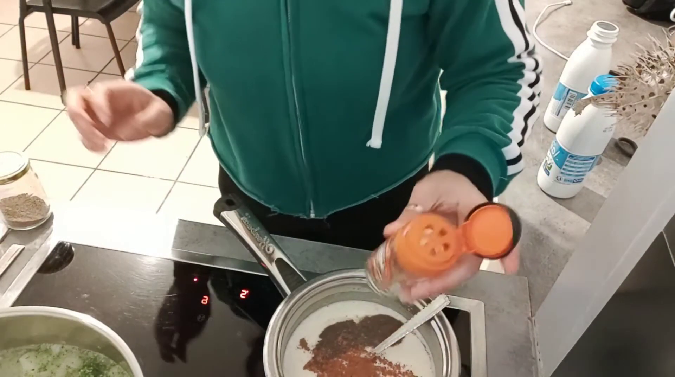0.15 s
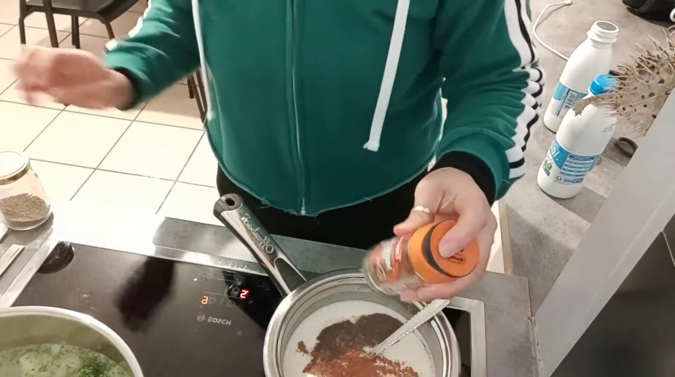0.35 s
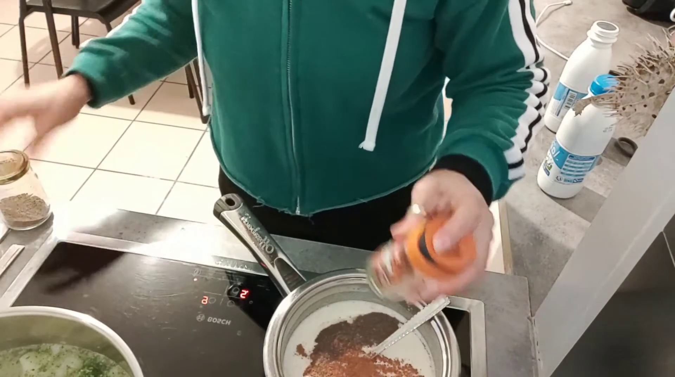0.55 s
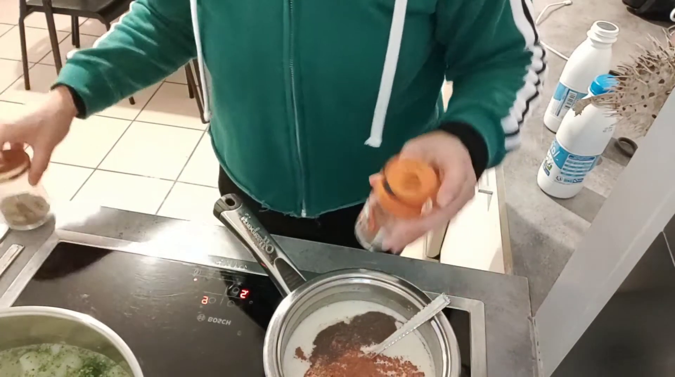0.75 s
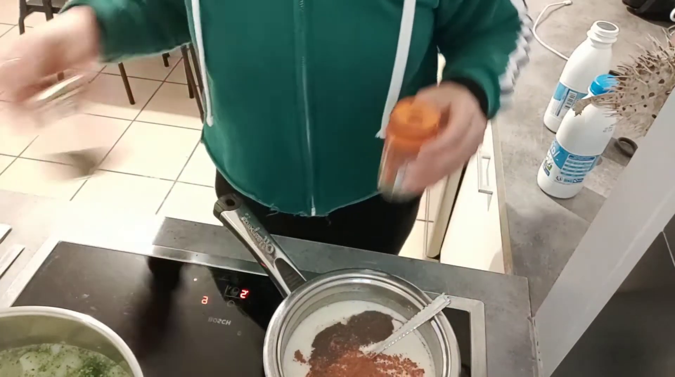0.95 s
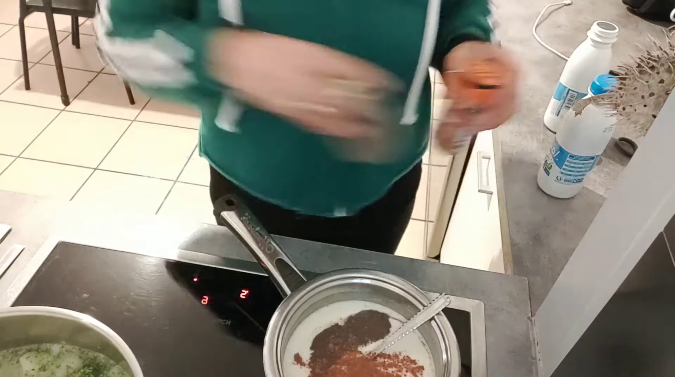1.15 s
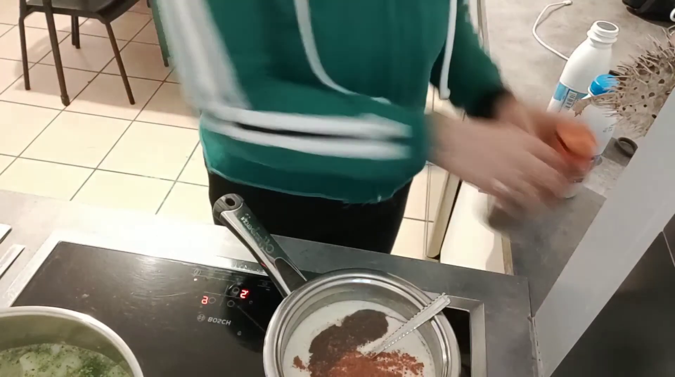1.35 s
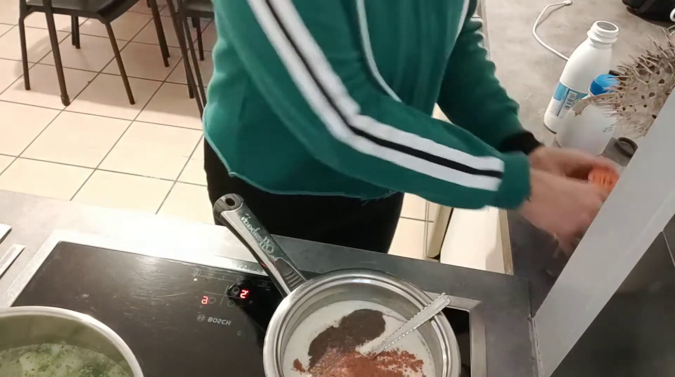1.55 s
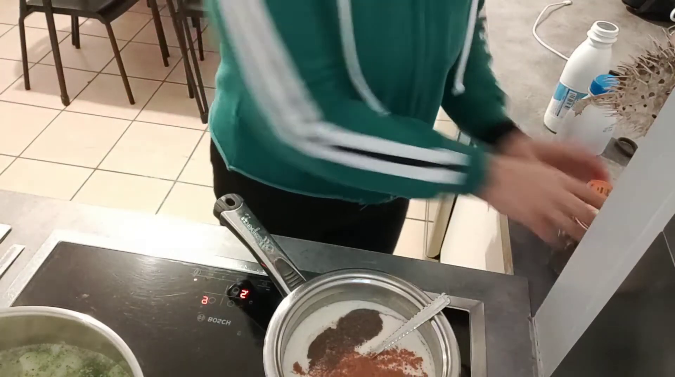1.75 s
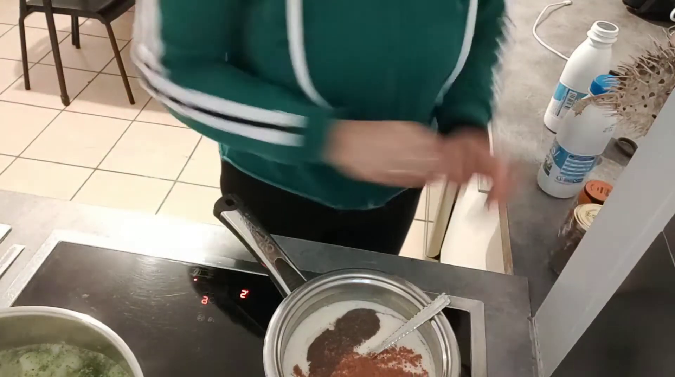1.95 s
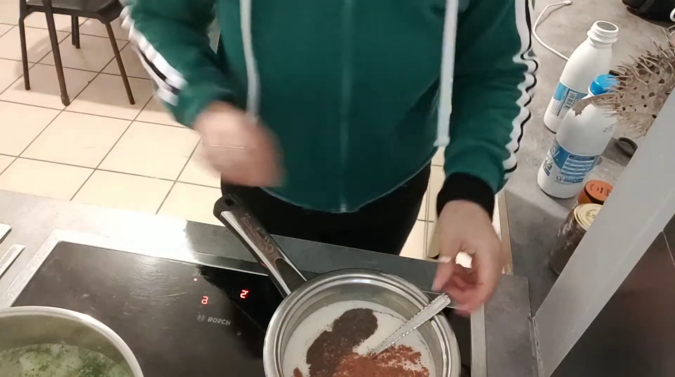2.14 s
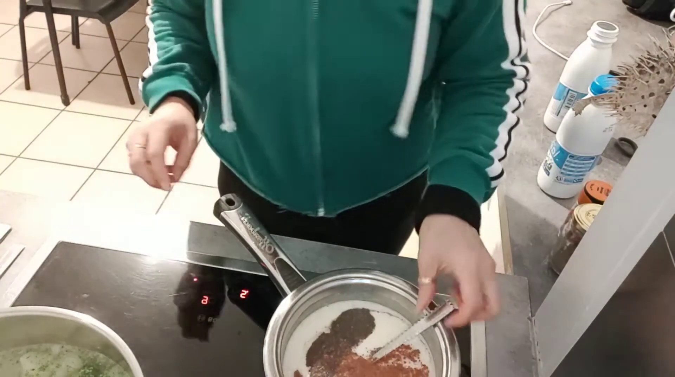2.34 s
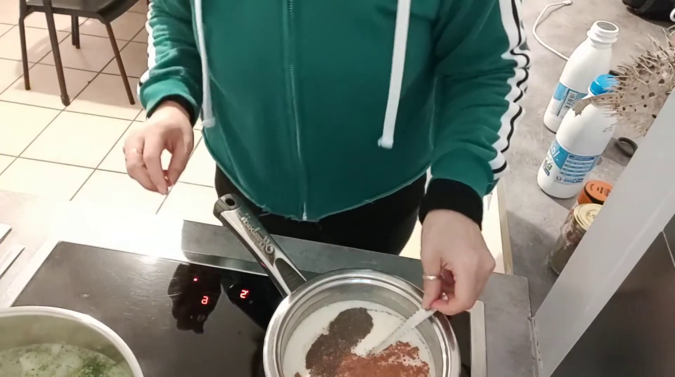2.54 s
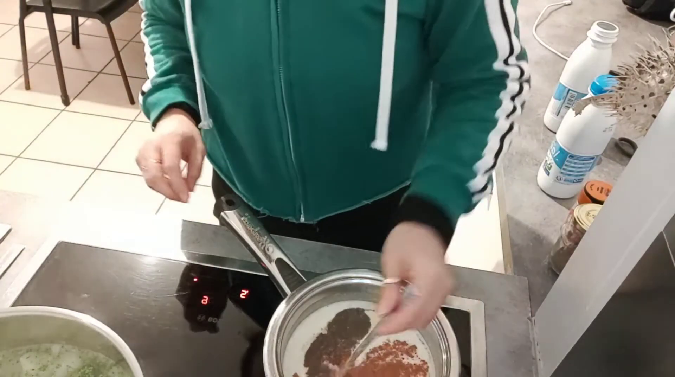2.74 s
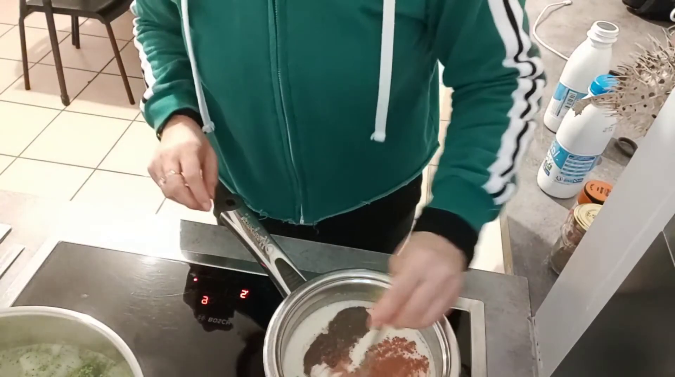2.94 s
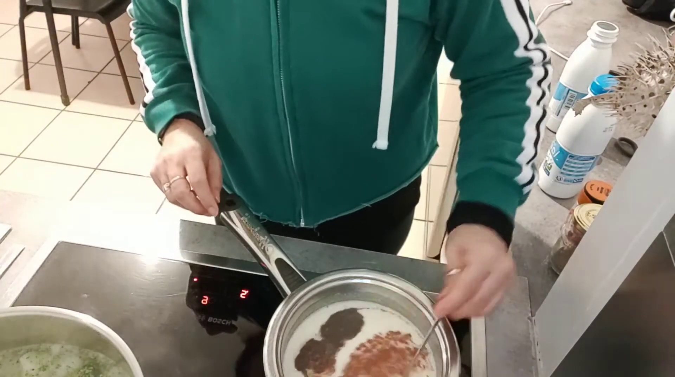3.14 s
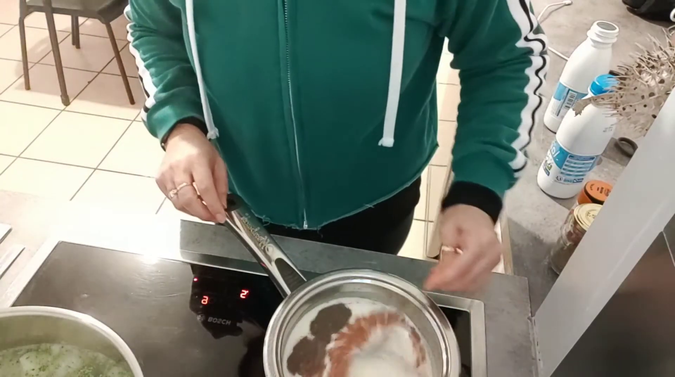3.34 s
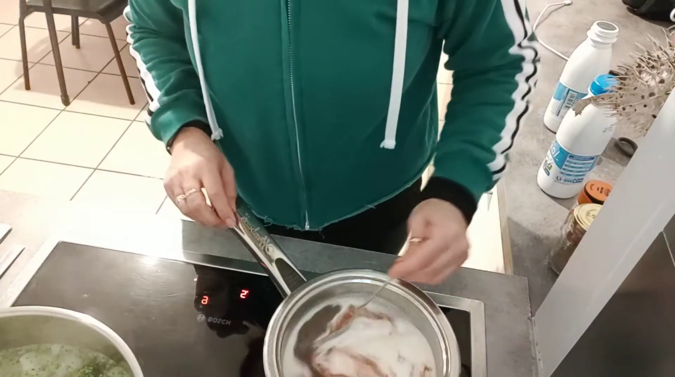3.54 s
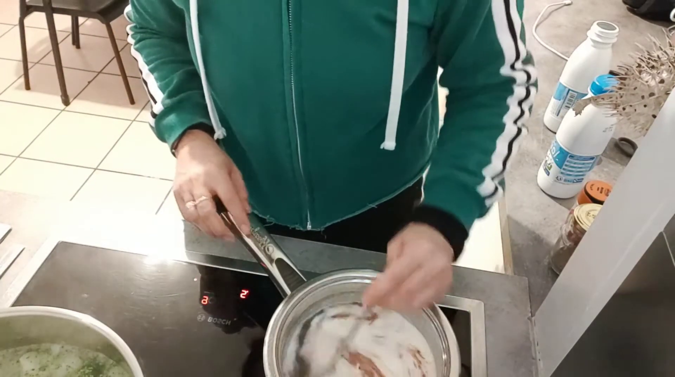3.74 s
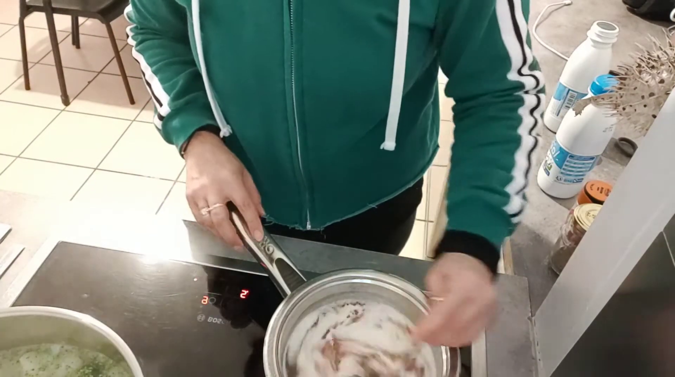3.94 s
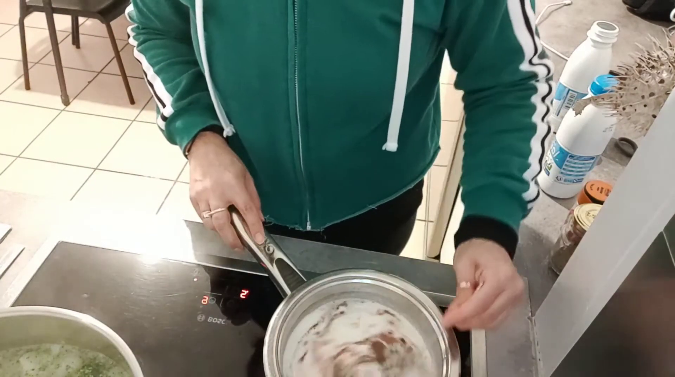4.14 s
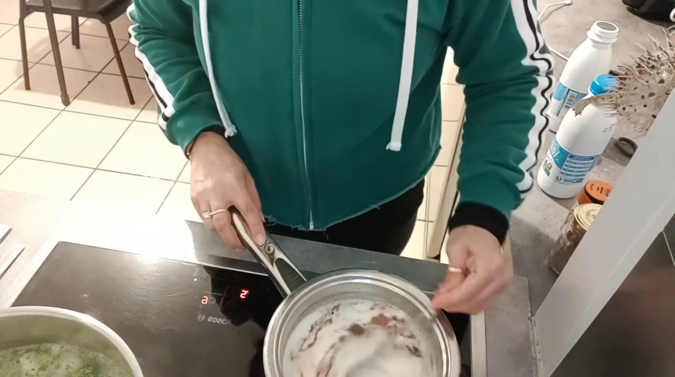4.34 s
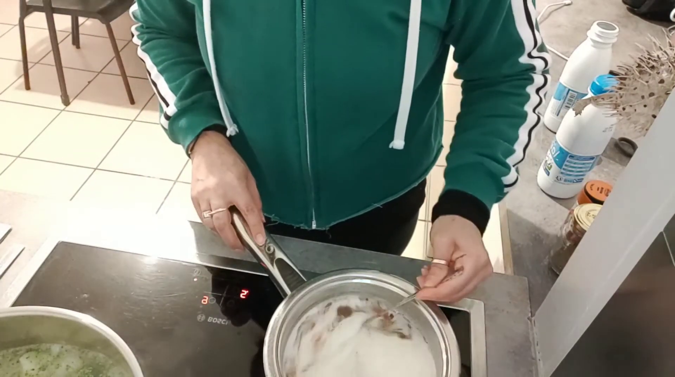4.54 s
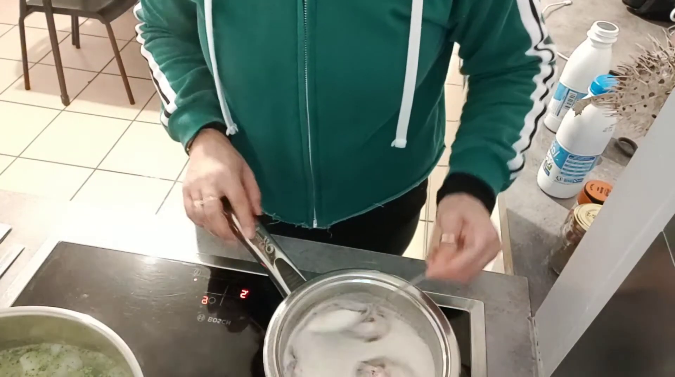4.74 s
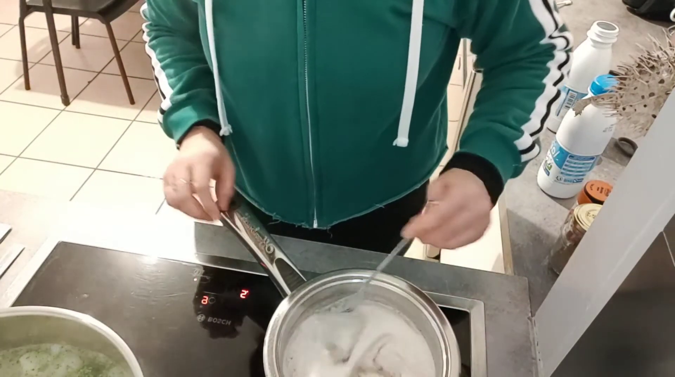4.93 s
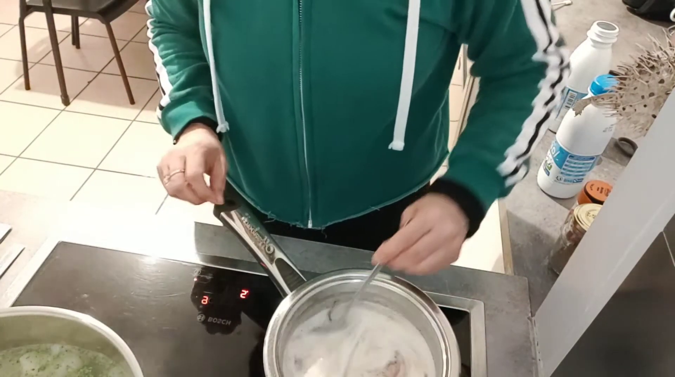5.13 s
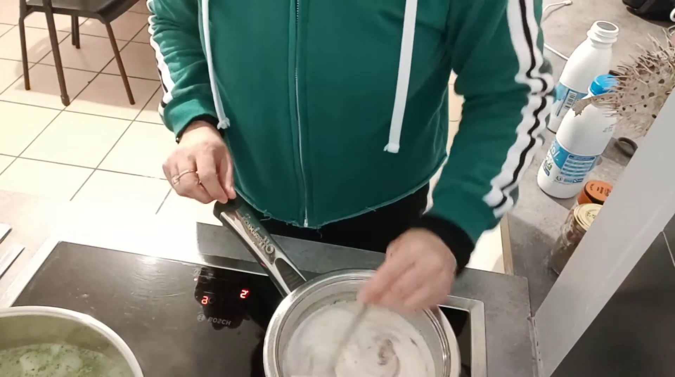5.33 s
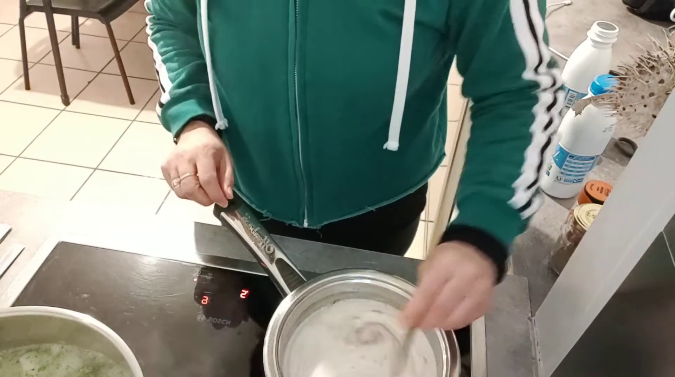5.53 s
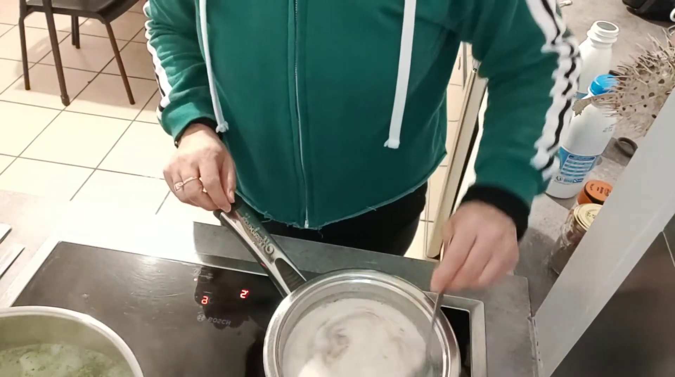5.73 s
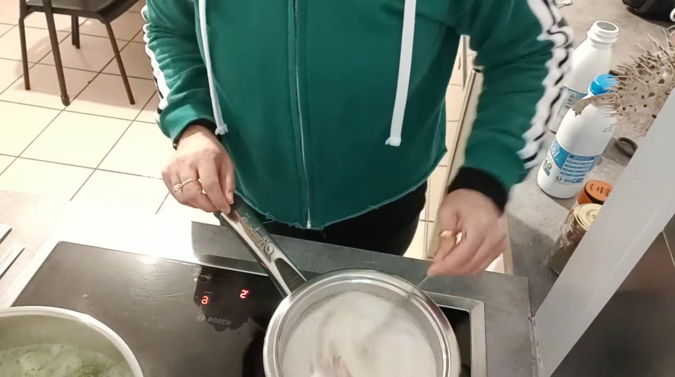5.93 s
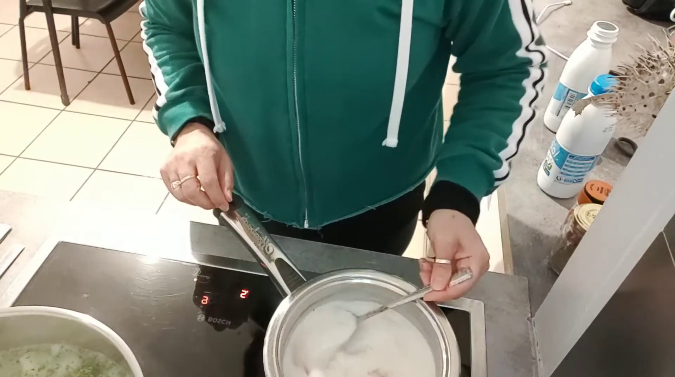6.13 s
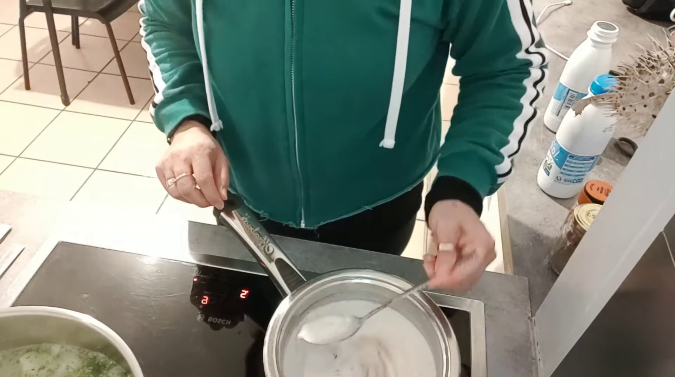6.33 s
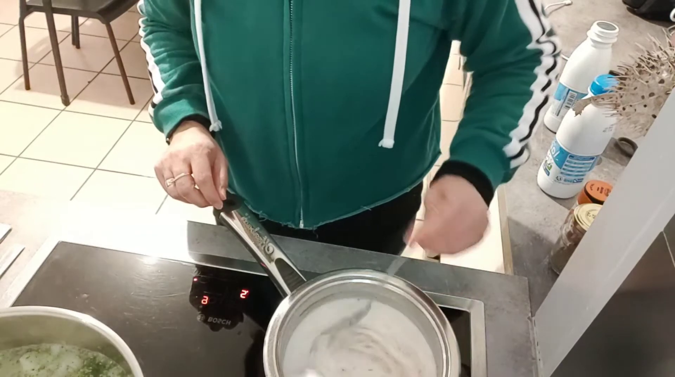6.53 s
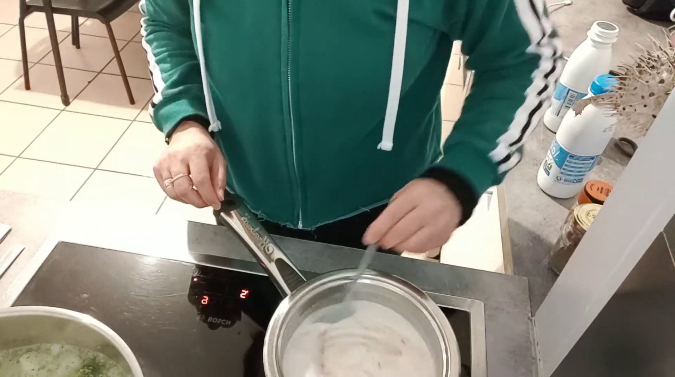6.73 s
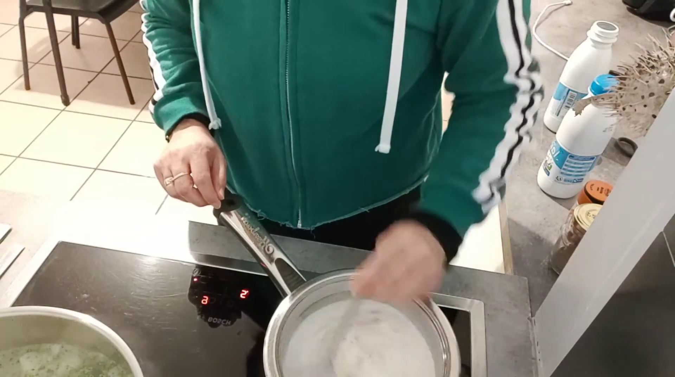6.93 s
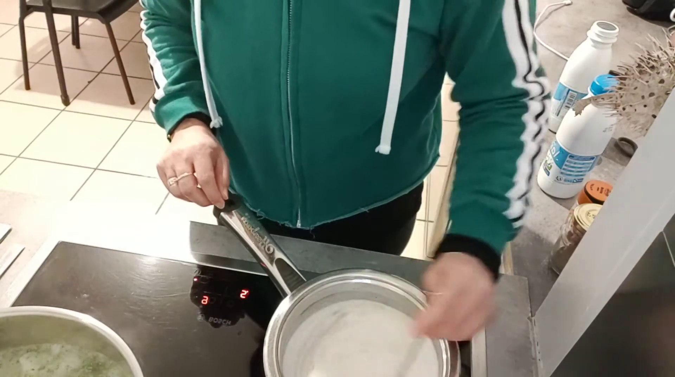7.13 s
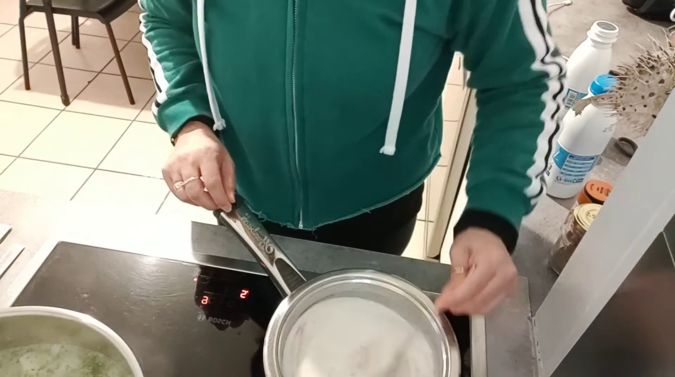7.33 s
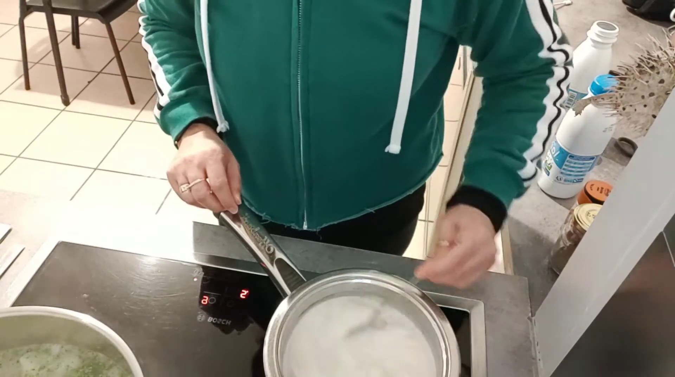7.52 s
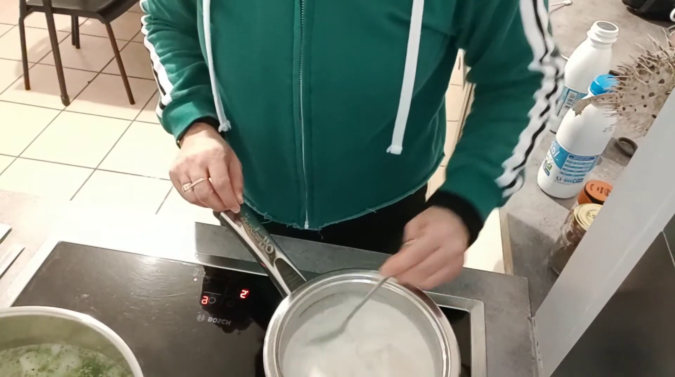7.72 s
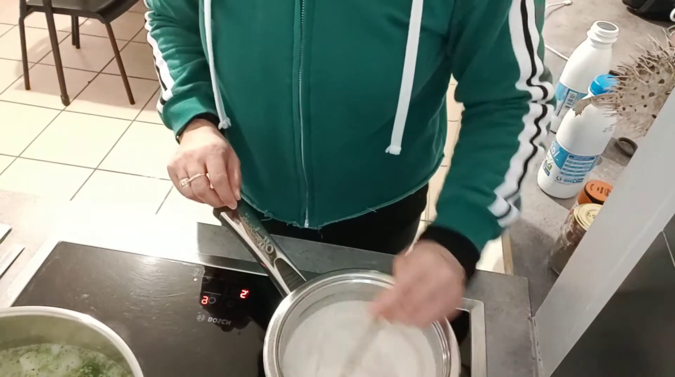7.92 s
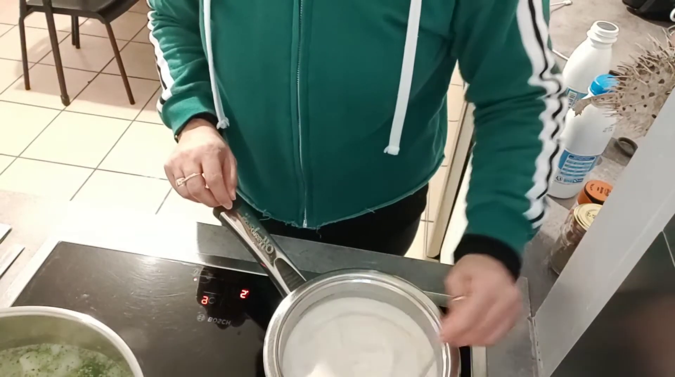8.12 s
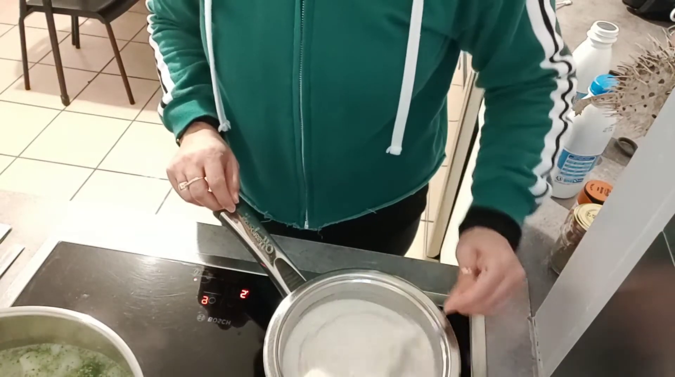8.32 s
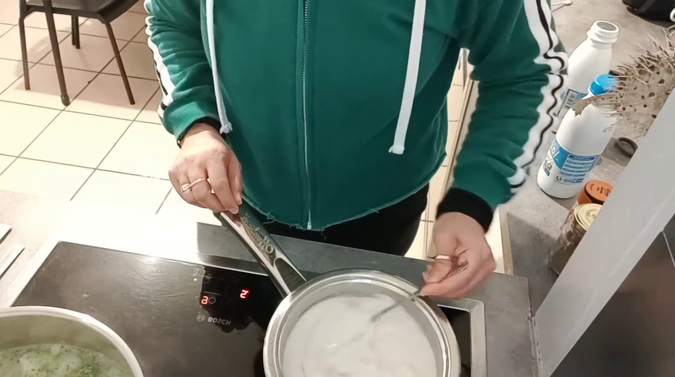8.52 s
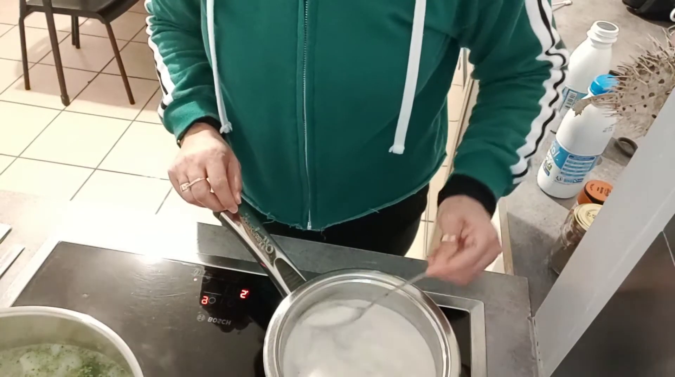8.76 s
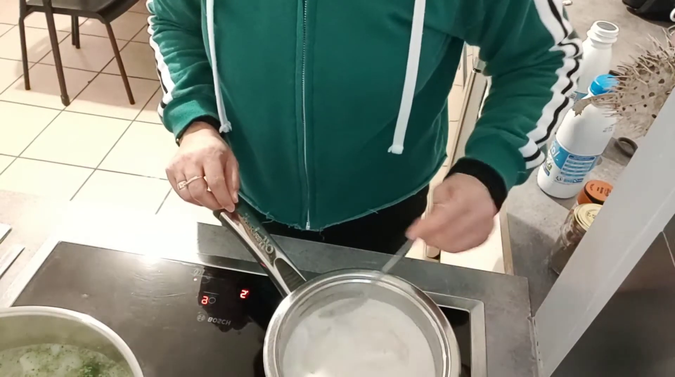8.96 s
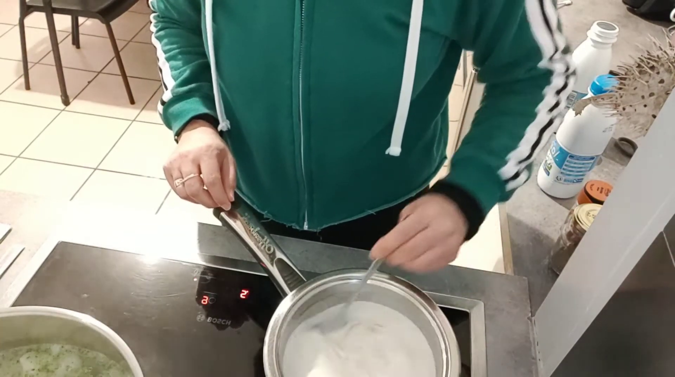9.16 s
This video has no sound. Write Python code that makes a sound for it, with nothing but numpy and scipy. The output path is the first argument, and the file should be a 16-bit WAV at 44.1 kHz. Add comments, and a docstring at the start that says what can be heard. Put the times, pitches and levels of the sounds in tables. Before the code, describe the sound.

Close stereo pickup of cooking in a reverberant tiled kitchen: a dull lid snap, a faint slide and sleeve brush, then a loud cluster of knocks as glass jars settle on the worktop. A whisk handle clinks brightly; wires scrape the filled pan bottom in short bursts, with muffled churning, bubble plops, low bumps and ringing wall knocks. Quiet fan hum continues underneath.

```python
"""A jar's plastic lid snaps shut over the hum of a hob in a tiled kitchen; jars land on the worktop,
a metal whisk clinks, then stirs white sauce in a steel pan, scraping its bottom and knocking its wall.
Contacts are pulse, crack and decaying modes; scraping is random stick-slip jerks through resonances.
Sauce is filtered slips, ringing bubbles and gliding tones; hum and room tone are filtered noise."""
import sys
import numpy as np
from scipy import signal
from scipy.fft import rfft, irfft
from scipy.io import wavfile
from scipy.ndimage import uniform_filter1d

SR = 44100
rng = np.random.default_rng(int(sys.argv[2]) if len(sys.argv) > 2 else 0)


def wrap_up_sound(samples):
    """Save the sound to the file named by the first command line argument, as 16-bit audio."""
    columns = np.atleast_2d(samples).T
    # keep every value between -1 and 1, then stretch to whole-number steps
    tamed = np.clip(columns, -1, 1)
    steps = np.round(tamed * 32767).astype(np.int16)
    wavfile.write(sys.argv[1], SR, steps)


N = 405279
TIME = np.arange(N) / SR
PORTS_APART_HZ = 567   # well below this both microphone ports hear nearly the same
STROKE_ATTACK_S = 0.0091   # shared by the strokes and the circling

# whisk strokes over the pan bottom; bottom and grit are relative to scrape (pressure):
# flat wires ring the bottom, wires on their tips grate
# start_s, length_s, scrape_db, bottom_db, grit_db, ring_hz
STROKES = [(2.965, 0.2, -60.5, -8, -9, 1250), (3.171, 0.087, -47, -9, -3.5, 1250),
           (3.224, 0.038, -43, -10, -10, 1250), (3.322, 0.054, -52, -8, -2.5, 1150),
           (3.4, 0.056, -48.5, -9, -2.5, 1050), (3.438, 0.069, -50.5, -5.5, -9.5, 985),
           (3.679, 0.26, -58.5, -1, -8.5, 1368), (4.033, 0.1, -62, 5.5, -5, 1371),
           (4.134, 0.2023, -57.5, 2.5, -7, 1260), (4.352, 0.0492, -51.5, 1.5, -5.5, 1020),
           (4.418, 0.0717, -52.5, 1.5, -11.5, 953.5), (5.201, 0.4, -59.5, -4, -9, 1250),
           (5.736, 0.11, -51.5, -3, -8.5, 1559), (5.959, 0.026, -47, -13, -9, 1143),
           (6.84, 0.283, -58, -3.5, -7, 1250), (7.215, 0.1, -49, -7, -12, 1336),
           (7.313, 0.046, -53, 11, -6, 1330), (7.377, 0.0645, -41, -1.5, -8, 1190),
           (7.429, 0.076, -41.5, -3.5, -6, 1002), (7.526, 0.066, -47.5, -3, -16, 1105),
           (7.828, 0.38, -63, -3, -5, 1250), (8.195, 0.105, -47, -2, -15, 1412),
           (8.273, 0.0605, -41.5, 1.5, -6, 1265), (8.329, 0.04, -54, 8, -2, 1100),
           (8.421, 0.071, -50, 2, -2, 1101)]
# ring of the filled pan: pitch_hz, level_db, t60_s
PAN_MODES = [(183, -5, .2), (720, -7, .1), (905, -7, .14), (1030, 0, .12), (1220, -4, .06), (1370, -2, .12),
             (1690, -1, .09), (1940, -4, .08), (2480, 4.5, .05), (2570, -1, .08), (2890, 1, .06)]
# ring of the whisk handle: pitch_hz, level_db, t60_s
HANDLE_MODES = [(360.3, -9, 0.34), (782, -0.5, 0.16), (1830, -10.5, 0.13), (2533, -7, 0.12),
                (2864, 8, 0.15), (7760, 4.5, 0.13), (8340, -4, 0.14), (9180, 1.5, 0.21), (10870, -5, 0.15)]


def scraping(scrape, bottom, grit, room):
    """Wires drag over the pan bottom in stick-slip jerks, ringing it and themselves; their tips grate."""
    # resonances of wires: pitch_hz, width_hz (per filter pass), level_db
    wire_ring = [(1730, 650, 2), (2042, 130, 2.5), (2280, 230, 0), (2700, 460, -1)]
    # resonances of wire tips: pitch_hz, width_hz (per filter pass), level_db
    tip_ring = [(2960, 150, -1.4), (3232, 170, -0.99), (3870, 780, -1.4)]
    # resonances of the pan bottom: pitch_hz, width_hz (per filter pass), level_db
    bottom_ring = [(845, 140, -6.5), (1043, 19, 0), (1269, 66, 0)]
    # spectrum of the grating: freq_hz, level_db
    grit_colour = [(2500, -73), (4500, -3.5), (5600, 3.5), (7200, 7), (8700, 6.5), (10000, -7.5),
                   (12000, -15), (15500, -12.5)]
    tip_db = 1   # over the hiss
    contact_db, pan_sing_db = 1, -10.5

    jerks = slips(per_s=1700, size_db=2.8)
    wires = wavering(jerks, wire_ring, wander=0.02, flicker_db=3.0)
    wires = rms_one(butter(wires, [1400, 3300], "band"))
    tips = wavering(jerks, tip_ring, wander=0.022, flicker_db=0.5)
    tips = rms_one(butter(tips, [2400, 4300], "band"))

    pan = wavering(jerks, bottom_ring, wander=0.0095, flicker_db=2.5)
    pan = pan + from_db(contact_db) * contact_ring(jerks)
    pan = rms_one(butter(pan, [500, 1800], "band"))
    # the pan's own modes, decay time turned into bandwidth
    sing_modes = [(hz, np.log(1000) / (np.pi * t60), db)
                  for hz, db, t60 in PAN_MODES if 500 < hz < 2600]
    pan = rms_one(pan + from_db(pan_sing_db) * resonate(jerks, sing_modes))

    hiss = rms_one(colour(slips(per_s=4400, size_db=-1.0), grit_colour))   # finest slips are densest
    dry = scrape * wires + bottom * pan + grit * (hiss + from_db(tip_db) * tips)
    return dry + from_db(-3.5) * through(dry, room)


def stirring():
    """Strength of scrape, bottom ring and grit: pressure raises all three, wire tilt shifts their balance."""
    stroke_t60_s, stroke_swell = 0.16, 0.3   # swell: share of stroke length added to the attack
    stir_start_s, stir_length_s, stir_t60_s = 2.5, 6.8, 0.87
    light_scrape_db, light_ring_db = -76.5, -70   # light touch between strokes
    catches_per_s, catch_db = 32, 0.18   # knot rate and spread of the level wander

    circling = swell(stir_start_s, stir_length_s, STROKE_ATTACK_S, stir_t60_s)
    scrape = from_db(light_scrape_db) * circling
    bottom = from_db(light_ring_db) * circling
    grit = 0
    for start_s, length_s, scrape_db, bottom_db, grit_db, _ in STROKES:
        attack_s = STROKE_ATTACK_S + stroke_swell * length_s
        stroke = from_db(scrape_db) * swell(start_s, length_s, attack_s, stroke_t60_s)
        scrape = np.maximum(scrape, stroke)
        bottom = np.maximum(bottom, from_db(bottom_db) * stroke)
        grit = np.maximum(grit, from_db(grit_db) * stroke)
    catching = from_db(catch_db * drift(catches_per_s))
    return scrape * catching, bottom * catching, grit * catching


def contact_ring(jerks):
    """The resonance under the whisk glides from each stroke's pitch to the next."""
    start_s, length_s, *_, ring_hz = np.transpose(STROKES)
    hz = np.interp(TIME, start_s + length_s / 2, ring_hz)
    mean_hz, width_hz = hz.mean(), 105
    return wavering(jerks, [(mean_hz, width_hz, 0)], wander=0.015, flicker_db=-0.5, pitch=hz / mean_hz)


def wavering(x, resonances, wander, flicker_db, pitch=1):
    """Resonances slide in pitch and flicker as the whisk moves and sauce covers and bares the steel."""
    out = 0
    for resonance in resonances:
        # uneven reading speed bends the pitch
        place = np.cumsum(pitch + wander * drift(14)) % N
        narrow = resonate(resonate(x, [resonance]), [resonance])
        ringing = np.array([np.interp(place, np.arange(N), side) for side in narrow])
        out = out + ringing * from_db(resonance[2] + flicker_db * drift(22))
    return rms_one(out)


def slips(per_s, size_db):
    """Stick-slip jerks of uneven size come in clumps, mixed differently at each port; unit power."""
    sizes = from_db(size_db * np.minimum(rng.exponential(1, N), 5))
    chance = per_s * from_db(3 * drift(45)) / SR
    return rms_one((rng.random(N) < chance) * sizes * diffuse(N))


def sauce(churn, room):
    """Thick sauce churns softly and pops; air pockets and wet wires glide in pitch."""
    # spectrum of the slosh: freq_hz, level_db
    churn_colour = [(40, 27.5), (100, -9), (175, -26), (280, -20), (380, 16), (520, 13.5), (750, -17),
                    (1200, 11)]
    slosh = colour(slips(per_s=900, size_db=8.5), churn_colour)
    slosh = from_db(-11) * churn * rms_one(butter(slosh, 1650, "low", order=4))
    wet = from_db(-11) * churn * bubbles(per_s=320, size_db=1.0, cycles=16)
    wet = wet + glides() + plops()
    return slosh + wet + from_db(-5) * through(wet, room)


def churning(scrape):
    """Heavy sauce follows the scrape smoothed and compressed, and is pushed a little ahead of it."""
    churn_db, follows = -43.5, 0.77   # level at the hardest push; share of the push's swing in dB
    lead_s, smooth_s = 0.1, 0.24
    push = np.maximum(uniform_filter1d(scrape, round(smooth_s * SR)), 0)
    return from_db(churn_db) * np.interp(TIME + lead_s, TIME, push / push.max()) ** follows


def bubbles(per_s, size_db, cycles, count=18):
    """Small wet pops excite resonances at scattered pitches, softened by thick sauce; unit power."""
    pops = slips(per_s, size_db)
    dealt = rng.integers(0, count, N)   # each pop goes to one pitch
    rings = 0
    for k, hz in enumerate(np.geomspace(420, 2200, count)):
        rings = rings + resonate(pops * (dealt == k) + 1e-18, [(hz, hz / cycles, 0)])
    return rms_one(butter(rings, 3200, "low"))


def glides():
    """Gulps of air and squeaks of wet wire: tones swell and fade as their pitch slides unsteadily."""
    # start_s, length_s, from_hz, to_hz, level_db
    glide_rows = [(3.24, .05, 1780, 1950, -45), (3.425, .11, 2400, 2200, -48),
                  (7.31, .032, 2000, 2400, -47), (7.445, .05, 980, 740, -45),
                  (7.512, .035, 2450, 2800, -45), (8.39, .052, 560, 1100, -42),
                  (8.48, .04, 3700, 4100, -48)]
    out = np.zeros(N)
    unsteady = 1 + 0.04 * drift(450)
    flutter = from_db(2 * drift(250))
    for start_s, length_s, from_hz, to_hz, level_db in glide_rows:
        span = slice(round(start_s * SR), round((start_s + length_s) * SR))
        age = (TIME[span] - start_s) / length_s
        hz = (from_hz + (to_hz - from_hz) * age) * unsteady[span]
        tone = np.sin(2 * np.pi * np.cumsum(hz) / SR)
        out[span] += from_db(level_db) * flutter[span] * np.sin(np.pi * age) * tone
    return out


def plops():
    """Single air pockets burst: a short damped note that rises a little."""
    # start_s, pitch_hz, level_db
    plop_rows = [(3.795, 1025, -43.5), (4.1, 700, -44), (6.25, 674, -45), (6.336, 606, -46),
                 (6.503, 693, -46), (7.914, 1355, -38.5)]
    attack_s, t60_s, rise_per_s = 0.0025, 0.083, 1.3   # rise: share of the pitch per second
    t, out = TIME[:SR // 4], np.zeros(N + SR)
    envelope = np.minimum(t / attack_s, 1) * from_db(-60 * t / t60_s)
    for start_s, hz, level_db in plop_rows:
        note = np.sin(2 * np.pi * hz * t * (1 + rise_per_s * t / 2))
        out[round(start_s * SR):][:len(t)] += from_db(level_db) * envelope * note
    return out[:N]


def pan_knocks(room):
    """The whisk knocks the pan wall and rings the filled pan, less where sauce damps it."""
    # start_s, level_db, treble_db, ring_db
    knock_rows = [(5.1245, -15, -1.5, -0.5), (5.351, -30.5, -13.5, 1), (5.971, -38, -11, -3),
                  (6.7365, -18, 2.5, -2), (7.916, -33, -22, -2), (8.108, -42, -10, 6),
                  (8.556, -33.5, -2, -8), (9.1575, -20.5, -21, 1.5)]
    # freq_hz, level_db
    knock_colour = [(59, -73.5), (100, -6.5), (188, 2.5), (257, -11), (620, -15), (718, -5), (962, -15.5),
                    (1020, -11.5), (1460, -6.5), (1660, -16.5), (2270, -7), (2920, -7), (4450, -25),
                    (7350, -16), (15000, -25.5)]
    knocks = from_db(16.5) * blows(
        knock_rows, knock_colour, PAN_MODES, crack_t60=0.023, scatter_db=2.5, ring_db=0.0,
        room_db=-2.5, pan_db=0.0, bright_hz=1250, detune=0.0092, room=room)
    return butter(knocks, 8500, "low", order=3)   # wet contact blunts the top


def bottom_bumps(room):
    """The whisk bumps the pan bottom under the sauce: dull pulses with a few low modes."""
    # start_s, level_db, treble_db
    bump_rows = [(3.04, -42, 4), (4.57, -41.5, -2), (5.711, -35.5, -6), (5.922, -34.5, 4),
                 (5.975, -32.5, -14), (6.248, -34.5, -8)]
    # freq_hz, level_db
    bump_colour = [(50, -8), (170, 1), (280, -8.5), (700, -13.5), (1300, -10.5), (2200, -16.5), (5000, -42),
                   (15000, -57)]
    # pitch_hz, level_db, t60_s
    bump_modes = [(397, 7.5, 0.23), (722, 8.5, 0.1), (1025, 13, 0.16)]
    return from_db(17.5) * blows(
        bump_rows, bump_colour, bump_modes, crack_t60=0.15, scatter_db=11.0, ring_db=0.0,
        room_db=-3.5, pan_db=-2.5, bright_hz=880, detune=0.023, room=room)


def rim_tick(room):
    """The whisk handle ticks against the rim: a dry tick with a faint ring of the handle's modes."""
    # start_s, level_db, treble_db
    tick_rows = [(6.063, -36, -2)]
    # freq_hz, level_db
    tick_colour = [(300, 4.5), (700, -18), (3000, -9.5), (4600, -35), (8300, -6.5), (12000, -33),
                   (15500, -22)]
    return from_db(20.5) * blows(
        tick_rows, tick_colour, HANDLE_MODES, crack_t60=0.022, scatter_db=0, ring_db=-16,
        room_db=-2.5, pan_db=-1.0, bright_hz=3000, detune=0.063, room=room)


def whisk_clinks(room):
    """The whisk handle strikes the rim, ringing its sparse metal modes."""
    # start_s, level_db, treble_db
    clink_rows = [(2.3485, -42, 10.5), (2.351, -22, 0), (2.3565, -20, -17)]
    # freq_hz, level_db
    clink_colour = [(71, -31), (120, -8.5), (204, -8), (276, -20), (360, -9.5), (649, -11.5), (748, -15),
                    (1620, -31.5), (2340, -24), (2870, -11), (3050, -19.5), (4480, -33), (8770, -10.5),
                    (12100, -29), (15500, -20)]
    return from_db(19.5) * blows(
        clink_rows, clink_colour, HANDLE_MODES, crack_t60=0.031, scatter_db=15.0, ring_db=1,
        room_db=-1.0, pan_db=-1.0, bright_hz=2530, detune=0.00024, room=room, ring_in_room=0.31)


def jar_landings(room):
    """Jars land and rock on the worktop, ringing its modes."""
    # start_s, level_db, treble_db
    jar_rows = [(1.5965, -16.5, 8.5), (1.602, -10.5, 1.5), (1.626, -9.5, -2), (1.6395, -10, -1.5),
                (1.6505, -11.5, 0), (1.678, -18, 6.5), (1.691, -19.5, 5)]
    # freq_hz, level_db
    jar_colour = [(29, -34), (50, -6), (133, -6.5), (290, -11.5), (361, -5.5), (524, -13), (677, -11),
                  (810, -15), (895, -11), (1250, -9.5), (2060, -18.5), (2300, -27.5), (3620, -37.5),
                  (4300, -62), (5700, -50), (6450, -39), (7200, -43), (8160, -43), (13000, -71)]
    # pitch_hz, level_db
    worktop_modes = [(134.6, -36), (360.7, -30.5), (446.8, -39), (704, -38.5), (737.5, -39), (888.2, -36.5),
                     (910, -35.5), (942.1, -45), (1017, -46), (1125, -29), (1559, -38.5), (1615, -44),
                     (1739, -43.5), (1981, -49)]
    worktop_t60_s = 0.34
    modes = [(hz, db, worktop_t60_s) for hz, db in worktop_modes]
    jars = from_db(18) * blows(
        jar_rows, jar_colour, modes, crack_t60=0.1, scatter_db=23, ring_db=1.5,
        room_db=5.0, pan_db=-1.5, bright_hz=895, detune=0.003, room=room, ring_in_room=0.34)
    return butter(jars, 10200, "low", order=4)   # thick glass on a heavy top gives little treble


def lid_snaps(room):
    """A plastic lid is pressed home, then latches, with short-lived modes."""
    # start_s, level_db, treble_db, ring_db
    lid_rows = [(.3338, -18.5, -21, -10), (.3742, -27.5, 2, 5.5)]
    # freq_hz, level_db
    lid_colour = [(47, -66), (80, -17), (172, 0), (318, -11.5), (493, -20), (600, -15.5), (900, -21.5),
                  (1400, -16.5), (1950, -24), (3300, -27.5), (4700, -42.5), (8300, -25), (15000, -56)]
    # pitch_hz, level_db, t60_s
    lid_modes = [(173, -11, 0.051), (1330, 5, 0.032), (1570, 5, 0.09), (1910, 14.5, 0.016)]
    return from_db(19) * blows(
        lid_rows, lid_colour, lid_modes, crack_t60=0.035, scatter_db=4.5, ring_db=-5.5,
        room_db=-3.5, pan_db=1.5, bright_hz=600, detune=0.012, room=room)


def blows(rows, spectrum, modes, crack_t60, scatter_db, ring_db, room_db, pan_db, bright_hz, detune,
          room, ring_in_room=0.29):
    """Contacts on one body: a sharp pulse, a crack of dense modes, the ring of clear modes, the room."""
    crack_rise_s = 0.00031   # a blow takes a moment to spread through the body
    t, out = TIME[:SR], np.zeros((2, N + SR))
    pulse = unit_energy(colour((t == 0) * 1., spectrum))
    hz, mode_db, t60 = np.transpose(modes)[:, :, None]
    for start_s, level_db, treble_db, *extra_ring_db in rows:
        crack = diffuse(SR) * (1 - np.exp(-t / crack_rise_s)) * from_db(-60 * t / crack_t60)
        crack = unit_energy(colour(crack, spectrum))
        direct = unit_energy(pulse + from_db(scatter_db) * crack)

        # each contact point weights and loads the modes anew; each port hears its own phases
        pitch = hz * (1 + detune * rng.standard_normal(hz.shape))
        strength = from_db(mode_db + rng.normal(0, 1, hz.shape))
        phase_spread = np.minimum(hz.T / (2 * PORTS_APART_HZ), 1) ** 2
        phase = rng.uniform(-np.pi, np.pi, (2, len(hz))) * phase_spread
        partials = strength * np.exp((2j * np.pi * pitch - np.log(1000) / t60) * t)
        ring = unit_energy((np.exp(1j * phase) @ partials).imag)
        ring = from_db(ring_db + sum(extra_ring_db)) * ring

        echo = from_db(room_db) * unit_energy(through(pulse + ring_in_room * ring, room))
        hit = (direct + ring) * from_db([[pan_db / 2], [-pan_db / 2]]) + echo
        dull = butter(hit, bright_hz, "low", order=1)
        shaded = dull + from_db(treble_db) * (hit - dull)   # softer contacts have less treble
        first = round(start_s * SR)
        out[:, first:first + SR] += from_db(level_db) * shaded
    return out[:, :N]


def handling():
    """A jar slides on the worktop as it is picked up and a sleeve brushes past: resonant noise."""
    # start_s, length_s, level_db
    slide_rows = [(.68, 0.047, -50.5)]
    # start_s, length_s, level_db
    brush_rows = [(1.08, 0.12, -58.5)]
    rub = diffuse(N)
    slide = rubs(slide_rows) * resonate(rub, [(352, 50, 1.5), (456, 240, -7.5)])
    brush = rubs(brush_rows) * resonate(rub, [(2110, 430, 8.3), (7740, 1200, 1.5)])
    return slide + brush


def rubs(rows):
    """Summed envelope of hand movements, each swelling softly and dying away."""
    return sum(from_db(level_db) * swell(start_s, length_s, attack_s=0.028, t60=0.41)
               for start_s, length_s, level_db in rows)


def swell(start_s, length_s, attack_s, t60):
    """Envelope of one rubbing movement: attack, hold, dying release."""
    attack = np.clip((TIME - start_s) / attack_s, 0, 1)
    release_s = np.clip(TIME - start_s - length_s, 0, 2 * t60)
    return attack * np.exp(-np.log(1000) * release_s / t60)


def background():
    """Low room rumble and the hum of the hob's fan: shaped noise and noise through resonances."""
    # room tone spectrum: freq_hz, level_db
    room_tone = [(13, -55), (23, -0.5), (45, 8.5), (76, -0.5), (163, -6), (290, -13), (400, -14),
                 (679, -22), (869, -19), (1420, -26), (1730, -24), (4630, -44), (7190, -31), (15500, -52.5)]
    # hob resonances: pitch_hz, width_hz, level_db
    hob_hum = [(184.3, 6.2, 2), (364, 15.8, -1.5), (568.5, 5.6, -2.5), (700, 25.5, -7), (933, 16, -9.5),
               (1020, 14, -9.5)]
    air = from_db(-49) * rms_one(colour(diffuse(N), room_tone))
    hum = from_db(-58.5) * resonate(diffuse(N), hob_hum)
    return air * from_db(0.09 * drift(6.8)) + hum


def kitchen():
    """Response of the tiled room: dense reflections dying band by band."""
    # freq_hz, t60_s
    kitchen_t60 = [(100, 0.33), (350, 0.63), (1000, 0.89), (2500, 0.73), (7500, 0.62), (14000, 0.22)]
    t, edges, out = TIME[:SR], np.geomspace(35, 18000, 10), 0
    for low, high in zip(edges, edges[1:]):
        decay = from_db(-60 * t / at_hz(kitchen_t60, np.sqrt(low * high)))
        out = out + butter(diffuse(SR), [low, high], "band") * decay
    return unit_energy(out * (1 - np.exp(-t / 0.0005)))


def diffuse(size):
    """Noise from all sides: nearly alike at both ports in the bass, unrelated above."""
    mid, side = rng.standard_normal((2, size))
    side = butter(side, PORTS_APART_HZ, "high", order=4) + 0.026 * side
    return mid + side * np.array([[1], [-1]])


def drift(per_s):
    """Random wander of unit rms, in straight lines between per_s knots a second."""
    knots = rng.standard_normal(4096)
    return rms_one(np.interp(TIME * per_s, np.arange(len(knots)), knots))


def resonate(x, resonances):
    """Parallel resonances of (pitch_hz, width_hz, level_db) in alternating sign; unit power."""
    out = 0
    for k, (hz, width_hz, db) in enumerate(resonances):
        b, a = signal.iirpeak(hz, hz / width_hz, fs=SR)
        out = out + (-1) ** k * from_db(db) * signal.lfilter(b, a, x)
    return rms_one(out)


def colour(x, spectrum, size=8192):
    """Causal minimum-phase filter with the given spectrum, by folding its cepstrum."""
    gain = from_db(at_hz(spectrum, np.fft.rfftfreq(size, 1 / SR)))
    cepstrum = irfft(np.log(gain))
    cepstrum[1:size // 2] *= 2
    cepstrum[size // 2 + 1:] = 0
    return through(x, irfft(np.exp(rfft(cepstrum))))


def through(x, response):
    """Pass a sound through an impulse response."""
    return signal.oaconvolve(np.atleast_2d(x), np.atleast_2d(response), axes=1)[:, :x.shape[-1]]


def butter(x, hz, kind, order=2):
    """Butterworth filter."""
    return signal.sosfilt(signal.butter(order, hz, kind, fs=SR, output="sos"), x)


def at_hz(points, hz):
    """Read a table on a log-frequency axis."""
    f, value = np.transpose(points)
    return np.interp(np.log(np.maximum(hz, 1)), np.log(f), value)


def unit_energy(x):
    """Scale a response to unit mean energy per channel."""
    return rms_one(x) / np.sqrt(x.shape[-1])


def rms_one(x):
    """Scale to unit power."""
    return x / np.sqrt(np.mean(x ** 2) + 1e-20)


def from_db(db):
    """Decibels to gain."""
    return 10 ** (np.asarray(db) / 20)


def scene():
    """Every source in the one kitchen."""
    room = kitchen()
    scrape, bottom, grit = stirring()
    stir = scraping(scrape, bottom, grit, room) + sauce(churning(scrape), room)
    whisk = pan_knocks(room) + bottom_bumps(room) + rim_tick(room) + whisk_clinks(room)
    spicing = jar_landings(room) + lid_snaps(room) + handling()
    return stir + whisk + spicing + background()


def record(dry):
    """Each microphone port adds its own colour; the top is cut steeply."""
    # left port over right: freq_hz, level_db
    port_balance = [(200, -0.5), (550, 2.5), (2500, 0.6), (5500, 2), (8500, -2.5), (12500, -1)]
    cutoff_hz = 15800
    left = colour(dry[0], [(hz, db / 2) for hz, db in port_balance])
    right = colour(dry[1], [(hz, -db / 2) for hz, db in port_balance])
    steep = signal.ellip(10, 0.1, 80, cutoff_hz, fs=SR, output="sos")
    return signal.sosfilt(steep, np.vstack([left, right]))


dry = scene()
out = record(dry)
wrap_up_sound(out)
```